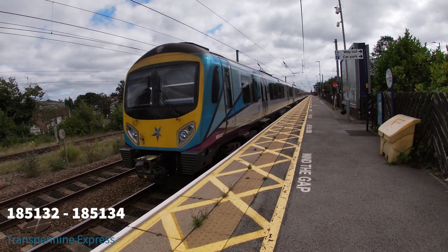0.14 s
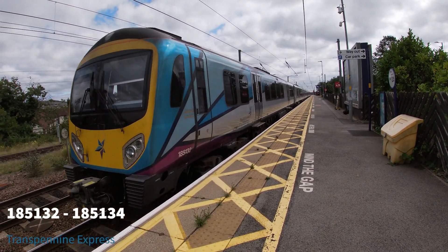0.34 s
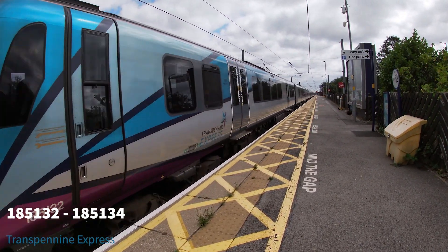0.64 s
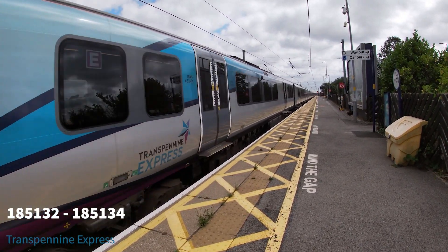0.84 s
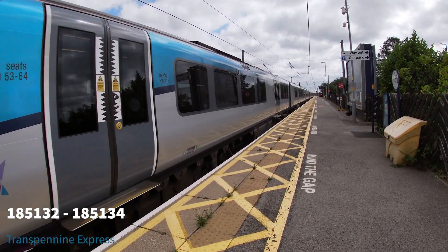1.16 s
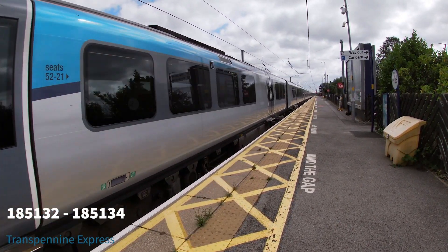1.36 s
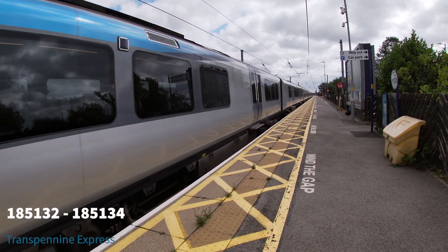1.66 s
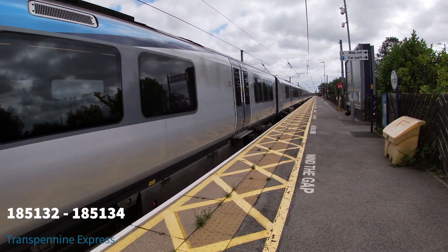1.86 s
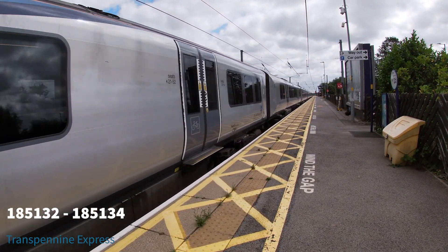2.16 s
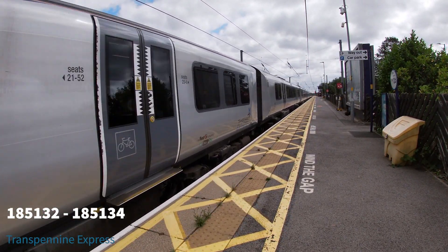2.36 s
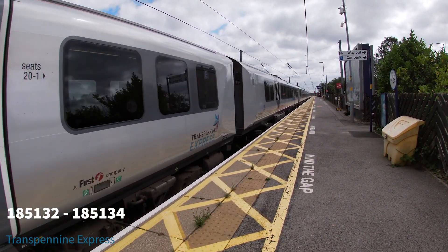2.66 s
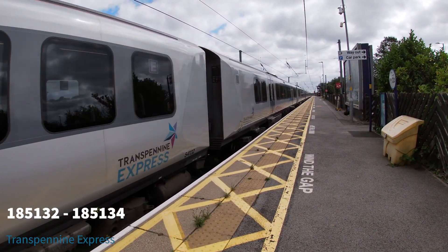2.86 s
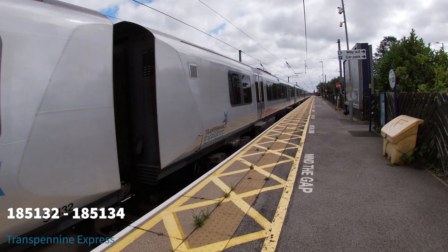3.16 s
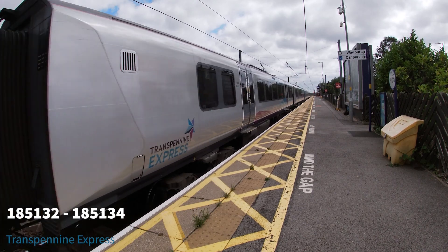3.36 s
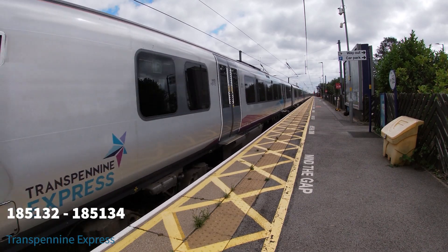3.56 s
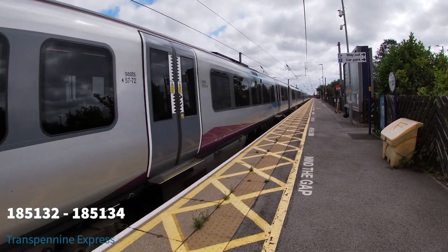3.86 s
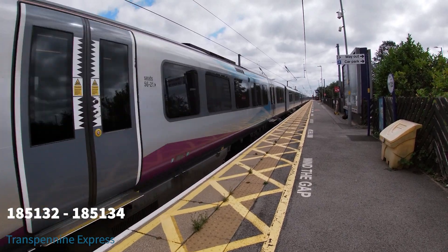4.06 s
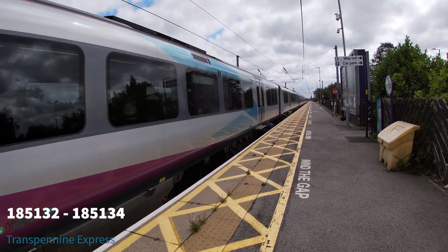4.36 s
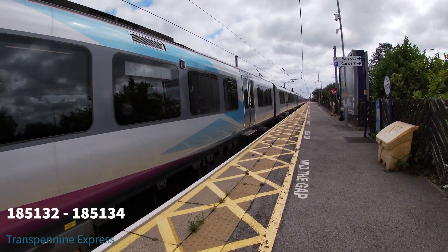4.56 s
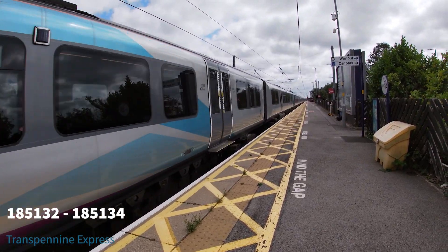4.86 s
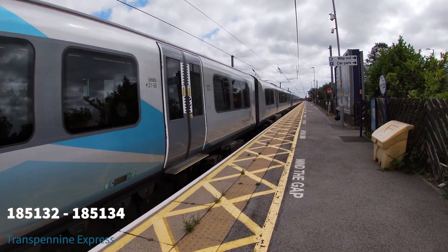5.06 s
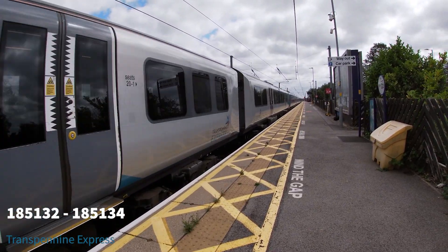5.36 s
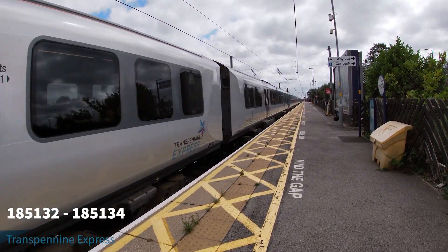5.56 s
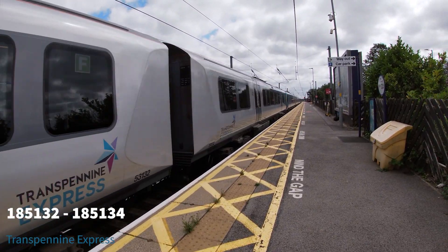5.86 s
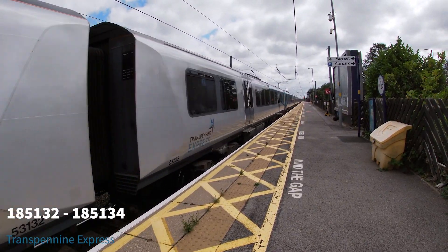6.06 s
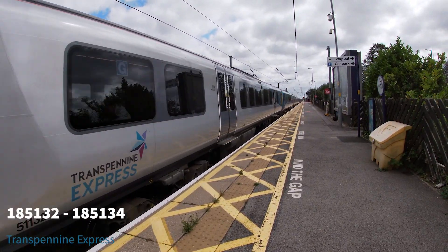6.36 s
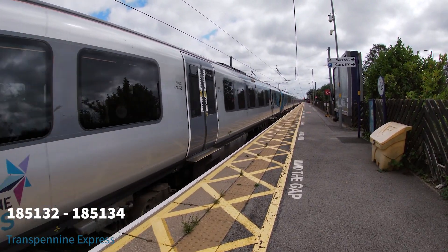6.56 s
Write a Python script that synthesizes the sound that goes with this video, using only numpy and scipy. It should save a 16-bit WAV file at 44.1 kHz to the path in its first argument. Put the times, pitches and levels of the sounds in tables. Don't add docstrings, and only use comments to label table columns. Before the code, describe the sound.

Heard from the platform edge, a coupled diesel train passes close. A low exhaust drone sinks slightly as the first engine goes by, with growl, faint gear whine and fan hiss. Dull wheel thumps come around one second and harder past three and a half. Rail roar and wheel singing then swell to a peak near five seconds, ease, and rumble on. Small, close mono microphone, mostly dark, peaks held back.

```python
import sys
import numpy as np
from scipy import signal
from scipy.fft import rfft, irfft
from scipy.io import wavfile

SR = 44100
rng = np.random.default_rng(int(sys.argv[2]) if len(sys.argv) > 2 else 0)


def decibels_to_gain(level_db):
    exponent = np.asarray(level_db, float) / 20
    return 10 ** exponent


def store_wav(level_fs):
    pcm = np.round(np.clip(np.atleast_2d(level_fs), -1, 1) * 32767)
    wavfile.write(sys.argv[1], SR, pcm.T.astype(np.int16))


N = 296352
SCREEN_DB = 22

# [t/s, half width/s, level/dB, tilt/(dB/octave)]
FAN_PASSES = [(0.45, 0.43, -18.5, -8), (1.05, 0.42, -13, -4.5), (1.75, 0.51, -8.5, -4.5),
              (2.25, 0.48, -8, 1), (2.8, 0.52, -8.5, 3), (3.7, 0.15, -10.5, 5.5), (4.3, 0.5, -5, 1.5),
              (4.85, .35, -3, 0), (5.2, 0.27, -1, -2), (5.55, 0.33, -1, 2), (6.6, 0.56, -7.5, -5)]
# [f/Hz, density/dB]
AIR_SPECTRUM = [(5300, -2), (5600, 17), (6000, 14), (6400, 7), (6800, 3.5), (7500, -1.5), (8300, -3.5),
                (9300, 2.5), (10200, -3), (11200, -7.5), (12000, -7), (13000, -7), (14500, -8.5),
                (15600, -18)]
# [t/s, half width/s, level/dB, tilt/(dB/octave)]
ROAR_PASSES = [(0.35, 0.61, -12, 4.5), (0.1, .2, -24, 1), (0.68, 0.17, -10.5, 2.5), (1.0, 0.25, -11.5, 2.5),
               (1.3, 0.18, -19, -1), (1.75, 0.6, -9.5, 3), (2.15, 0.34, -10.5, 0), (2.75, 0.43, -14.5, 2),
               (3.45, 0.45, -26.5, 9.5), (3.75, 0.2, -21.5, 7.5), (4.13, .14, -16, 8), (4.4, 0.25, -9.5, 5),
               (4.85, 0.68, 1.2, -0.5), (5.24, 0.34, 0.5, 0.3), (5.6, 0.44, -13.5, 6),
               (5.95, 2.1, -13.5, 3.5), (6.25, 1.4, -18, -9.5), (6.6, 0.22, -12, 3)]
# [f/Hz, density/dB]
ROAR_SPECTRUM = [(190, -30), (330, -3.5), (358, -1.5), (427, -9), (650, -10), (784, -15), (902, -17),
                 (1010, -17), (1740, -22), (1910, -23.5), (2090, -24), (2270, -24), (5400, -35.5),
                 (7020, -75.5), (11900, -120)]
# [t/s, half width/s, level/dB, tilt/(dB/octave)]
FLOOR_PASSES = [(0.35, 1.3, -15, -6), (0.53, 0.048, -4.5, -3.5), (0.7, 0.15, -4.5, -2.5),
                (0.95, 0.07, -8.5, 5), (1.25, 0.27, -7, 5), (1.85, 0.44, -17, 2), (2.05, .15, -11.5, 1.5),
                (2.87, 1.7, -19, -11), (3.1, 0.39, -10, 3.5), (3.61, 0.37, -8, -4), (4.2, 0.94, -5, 5.5),
                (4.8, 0.37, -7, 10), (5.03, 0.1, -1, 6), (5.25, 0.17, -5, 9), (5.9, 1, -16, -11.5),
                (5.85, 0.14, -4.5, 9), (6.3, 0.45, -3, 6), (6.7, 0.22, -1.5, -2.5)]
# [f/Hz, density/dB]
RUMBLE_SPECTRUM = [(20, 0), (30, -7.5), (38, -3.5), (48, -0.5), (60, -6), (110, 0), (160, -3.5), (230, 0.5),
                   (300, -4.5), (340, -18)]
# [start t/s, end t/s, first f/Hz, last f/Hz, width/Hz]
HOLLOWS = [(1.4, 2.2, 600, 820, 150), (3.6, 4.5, 560, 680, 200), (4.3, 5.4, 620, 980, 180),
           (4.9, 5.8, 420, 620, 160), (4.9, 5.9, 200, 310, 50), (3.9, 4.5, 200, 190, 35),
           (.4, 1.5, 560, 550, 90), (2.5, 3.7, 800, 700, 350), (4.9, 5.7, 3800, 4800, 900),
           (1.7, 2.8, 300, 290, 50), (.45, 1.15, 285, 300, 50), (4.75, 5.3, 190, 140, 70),
           (5.0, 5.5, 2000, 2200, 600), (1.35, 2.15, 580, 600, 70), (.1, 1.3, 640, 660, 120),
           (4.0, 4.4, 520, 540, 90), (6.35, 6.72, 210, 190, 60)]
HOLLOW_LEVELS_DB = [-36.5, -31.5, -29, -29, -21.5, -24, -39, -44.5, -45, -36, -34, -22, -37, -37, -42.5,
                    -31, -27]
# [start t/s, end t/s, first f/Hz, last f/Hz, width/Hz]
WHEEL_MODES = [(1.78, 2.3, 357, 349, 7), (2.3, 3.15, 348, 346, 5), (4.35, 4.95, 369, 367, 7),
               (4.85, 5.3, 354, 352, 8), (5.2, 6.3, 362, 352, 25), (4.1, 4.6, 660, 655, 10),
               (4.5, 5.4, 660, 638, 12), (4.1, 4.5, 718, 714, 10), (4.72, 5.25, 910, 890, 40),
               (5.2, 6.1, 880, 862, 35), (5.3, 5.8, 700, 690, 14), (.3, 2.2, 1740, 1715, 140),
               (2.15, 2.85, 1712, 1680, 90), (3.95, 5.05, 1818, 1798, 22), (4.9, 5.5, 1780, 1760, 30),
               (4.6, 5.7, 2070, 2050, 90), (4.2, 5.1, 2725, 2715, 45), (1.3, 2.9, 3120, 3060, 250),
               (.35, .65, 2420, 2400, 40), (1.4, 2.0, 1110, 1085, 80), (6.35, 6.7, 1210, 1195, 40),
               (4.5, 4.9, 262, 250, 12), (5.3, 5.65, 268, 276, 14), (.62, 1.1, 352, 350, 9)]
WHEEL_MODE_LEVELS_DB = [-31, -42, -25, -22, -31, -30, -32, -34, -28, -40, -39, -49, -49, -43, -41, -43, -50,
                        -52, -51, -49, -48, -23, -24, -41]
# [t/s, peak level/dB, ring f/Hz]
THUMPS = [
    (0.959, 1, 214),
    (1.152, 3, 193),
    (1.293, 0.5, 234),
    (3.593, 8, 228),
    (3.704, 2.5, 225),
    (3.805, -14, 208),
]
# [t/s, f/Hz]
FIRING_NOTE = [(0, 48.8), (.4, 48.6), (.8, 47.9), (1.2, 47.1), (1.5, 46.7), (1.7, 46.2), (2, 45.5),
               (2.4, 44.1), (2.65, 43.5), (3.1, 43.3), (3.45, 42.8), (3.9, 43.5), (4.6, 43.5), (4.9, 44),
               (5.2, 43), (5.8, 42.8), (6.72, 42.6)]
# [t/s, half width/s, level/dB]
EXHAUST_PASSES = [(0.15, 0.13, -38), (0.7, .25, -19), (1.15, 0.24, -17.5), (1.9, 0.64, -13.5),
                  (2.6, 0.88, -16), (3.05, 0.38, -18.5), (3.78, 0.18, -16.5), (4.35, 0.24, -13.5),
                  (4.72, 0.22, -21), (5.4, 0.22, -21), (5.86, 0.18, -19.5), (6.05, .1, -24),
                  (6.4, 0.15, -16.5), (6.72, 0.056, -15.5)]
# [t/s, half width/s, level/dB]
HALF_ORDER_PASSES = [(.6, 0.17, -21.5), (1.1, 0.33, -26.5), (1.799, 0.65, -29), (2.7, 0.43, -27),
                     (4.8, 0.71, -30), (6.1, .8, -36.5)]
# [t/s, half width/s, level/dB]
SECOND_PASSES = [(.65, 0.25, -24), (1.5, 0.37, -29), (1.999, 0.31, -31), (2.649, .2, -31.5),
                 (3.7, 1.1, -28), (5.9, 0.73, -31.5)]
# [t/s, half width/s, level/dB]
THIRD_PASSES = [(0.1, .4, -38), (0.679, 0.29, -29.5), (2.05, .2, -38)]
# [t/s, half width/s, level/dB]
FOURTH_PASSES = [(.55, .25, -38.5), (1.4, .4, -46.5), (4.2, .3, -45)]
# [t/s, half width/s, level/dB]
GEAR_LOW_PASSES = [(.55, 0.36, -48.5), (0.999, 0.23, -42.5), (1.5, 0.36, -46.5), (2.0, 0.32, -36),
                   (2.5, 0.14, -41)]
# [t/s, half width/s, level/dB]
GEAR_HIGH_PASSES = [(.6, 0.19, -43.5), (0.999, 0.16, -45.5), (1.7, 0.094, -40), (2.3, 0.52, -48)]
# [t/s, half width/s, level/dB]
GROWL_PASSES = [(.8, 0.2, -31), (1.3, 0.06, -35), (2.9, 0.73, -37.5)]
# [multiple of firing note, relative level/dB]
GROWL_ORDERS = [(2.5, 1), (3.5, -8), (4.5, -3), (5, -4), (5.5, -9), (6, -7)]


def rms_one(x):
    return x / np.sqrt(np.mean(x ** 2) + 1e-20)


def drift(rate_hz, step=1):
    pole = np.exp(-80 * np.pi * rate_hz / SR)
    white = rng.standard_normal(N // 40 + 2002)
    slow = rms_one(signal.lfilter([1], [1, -2 * pole, pole * pole], white)[2000:])
    return np.interp(np.arange(0, N, step) / 40, np.arange(len(slow)), slow)


def passing(rows, octaves=0, step=1):
    t = np.arange(0, N, step) / SR
    power = 1e-12
    for s, half_width_s, db, *tilt in rows:
        distance_loss_db = SCREEN_DB * np.log10(1 + ((t - s) / half_width_s) ** 2)
        power = power + decibels_to_gain(db + sum(tilt) * octaves - distance_loss_db) ** 2
    return 10 * np.log10(power)


def smooth_passing(rows):
    return np.repeat(passing(rows, step=16), 16)[:N]


def swelling_noise(rows, pivot_hz, spectrum, level_db, patchy_db, count):
    step = 64
    spectrum_hz, spectrum_db = np.transpose(spectrum)
    low_hz, high_hz = spectrum_hz[0], spectrum_hz[-1]
    hz = np.arange(N // 2 + 1) * SR / N + 1e-9
    log_hz = np.log(hz)
    noise = rfft(rng.standard_normal(N))
    noise *= decibels_to_gain(np.interp(log_hz, np.log(spectrum_hz), spectrum_db))
    noise *= (hz > low_hz) * (hz < high_hz)
    noise /= np.sqrt(np.mean(irfft(noise, N) ** 2))
    mids = np.log(np.geomspace(low_hz, high_hz, count))
    together = drift(33, step)
    out = np.zeros(N)
    for mid in mids:
        swell_db = passing(rows, (mid - np.log(pivot_hz)) / np.log(2), step)
        swell_db -= 10 * np.log10(np.mean(decibels_to_gain(swell_db) ** 2))
        flicker_db = patchy_db * (0.5 * together + drift(4.8, step))
        gain = np.interp(np.arange(N), np.arange(len(swell_db)) * step, decibels_to_gain(swell_db + flicker_db))
        triangle = np.clip(1 - abs(log_hz - mid) / (mids[1] - mids[0]), 0, 1)
        out += gain * irfft(noise * triangle, N)
    return out * decibels_to_gain(level_db)


def resonances(rows, levels_db, steady_hz):
    out = np.zeros(N)
    for (start_s, end_s, first_hz, last_hz, width_hz), db in zip(rows, levels_db):
        at, size = round(start_s * SR), round((end_s - start_s) * SR)
        lowpass = signal.butter(2, width_hz / 2, fs=SR, output="sos")
        slow = rms_one(signal.sosfilt(lowpass, rng.standard_normal((2, 2 * SR))))[:, -size:]
        phase = 2 * np.pi * np.cumsum(np.linspace(first_hz, last_hz, size)) / SR
        in_phase = (steady_hz / width_hz + slow[0]) * np.cos(phase)
        band = rms_one(in_phase + slow[1] * np.sin(phase))
        swell = np.sin(np.linspace(0, np.pi, size)) ** 0.65
        out[at:at + size] += decibels_to_gain(db) * swell * band
    return out


def tone(hz, db, waver_hz, flutter_db):
    phase = 2 * np.pi * (np.cumsum(hz + waver_hz * drift(7.1)) / SR + rng.random())
    return np.sqrt(2) * decibels_to_gain(db + flutter_db * drift(7.7)) * np.sin(phase)


def cooling_air():
    return swelling_noise(FAN_PASSES, 9000, AIR_SPECTRUM, level_db=-58.5, patchy_db=0.8, count=9)


def rail_roar():
    return swelling_noise(ROAR_PASSES, 1200, ROAR_SPECTRUM, level_db=-27.0, patchy_db=1.03, count=18)


def floor_rumble():
    return swelling_noise(FLOOR_PASSES, 120, RUMBLE_SPECTRUM, level_db=-21.0, patchy_db=0.5, count=10)


def hollows():
    return resonances(HOLLOWS, HOLLOW_LEVELS_DB, steady_hz=0)


def wheel_singing():
    return resonances(WHEEL_MODES, WHEEL_MODE_LEVELS_DB, steady_hz=17)


def floor_thumps(rise_s=0.004, t60_s=0.051):
    out, t = np.zeros(N), np.arange(SR // 5) / SR
    for s, db, hz in THUMPS:
        at = round(s * SR)
        decay = decibels_to_gain(db - 8.5 - 60 * t / t60_s)
        out[at:at + len(t)] += decay * (1 - np.exp(-t / rise_s)) * np.sin(2 * np.pi * hz * t)
    return out


def exhaust():
    firing_hz = np.interp(np.arange(N) / SR, *np.transpose(FIRING_NOTE))
    out = tone(firing_hz, smooth_passing(EXHAUST_PASSES), waver_hz=0.17, flutter_db=-1.0)
    locked = [(1.5, HALF_ORDER_PASSES), (2, SECOND_PASSES), (3, THIRD_PASSES), (4, FOURTH_PASSES),
              (11.78, GEAR_LOW_PASSES), (15, GEAR_HIGH_PASSES)]
    upper = [(multiple, smooth_passing(rows)) for multiple, rows in locked]
    growl_db = smooth_passing(GROWL_PASSES)
    upper += [(multiple, growl_db + db) for multiple, db in GROWL_ORDERS]
    for multiple, db in upper:
        out += tone(multiple * firing_hz, db, waver_hz=0.25 * multiple, flutter_db=1.5 + 0.14 * multiple)
    return out


def scene():
    background = cooling_air() + rail_roar() + floor_rumble()
    near = hollows() + wheel_singing() + floor_thumps()
    return (background + near + exhaust())[None]


def roll_off(x):
    return signal.sosfilt(signal.butter(12, 15700, fs=SR, output="sos"), x)


def record(dry):
    attack_s, threshold_db, slope, ceiling = 0.045, -15, 0.35, 1.05
    keep = np.exp(-1 / (attack_s * SR))
    level_db = 10 * np.log10(signal.lfilter([1 - keep], [1, -keep], dry ** 2) + 1e-9)
    held = dry * decibels_to_gain(1.0 - slope * np.maximum(level_db - threshold_db, 0))
    rounded = ceiling * np.tanh(held / ceiling) + 0.0017
    return roll_off(rounded)


dry = scene()
out = record(dry)
store_wav(out)
```